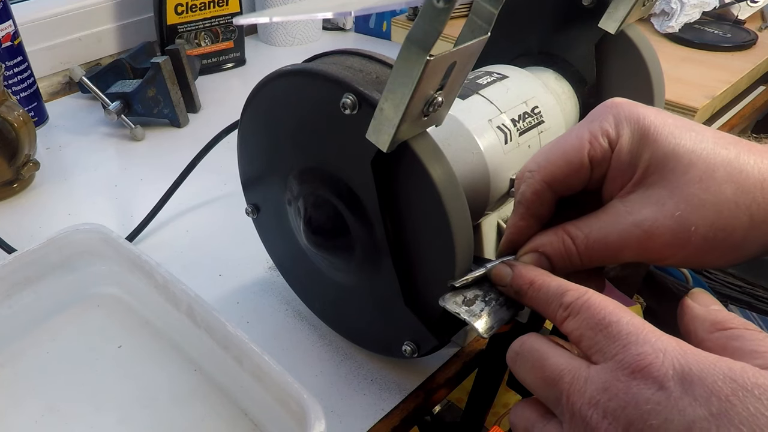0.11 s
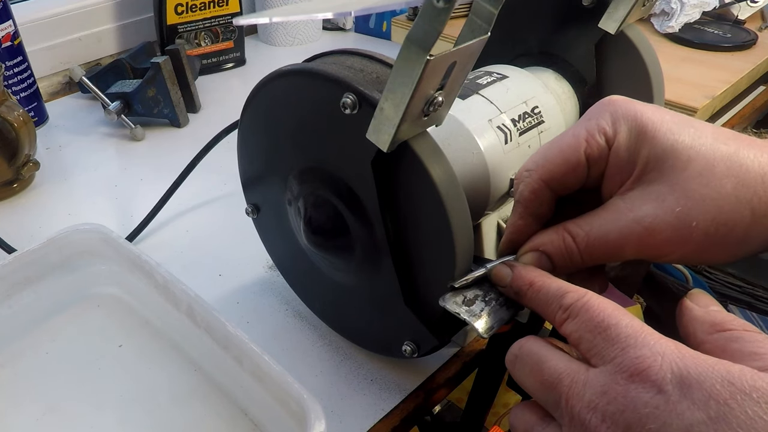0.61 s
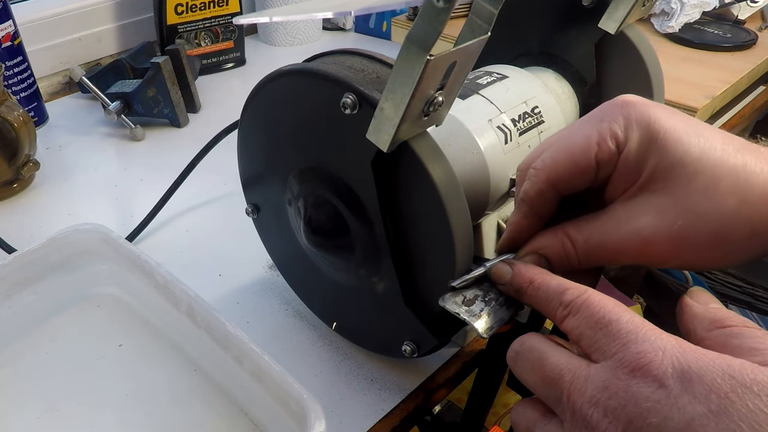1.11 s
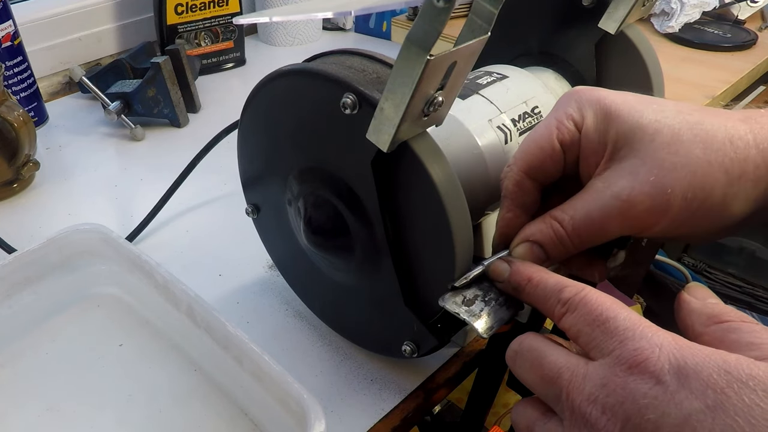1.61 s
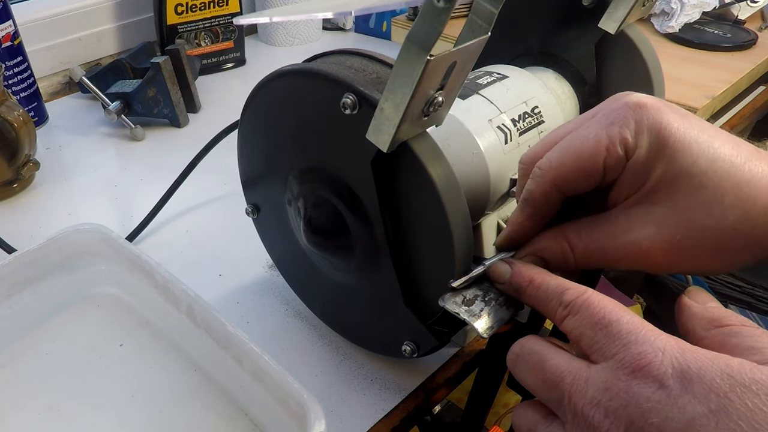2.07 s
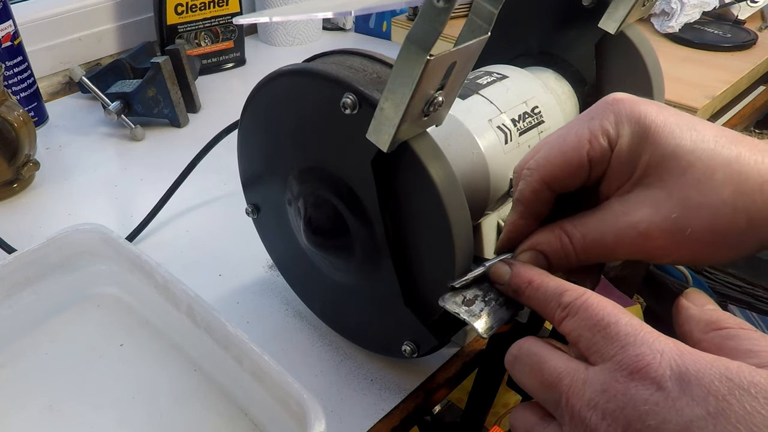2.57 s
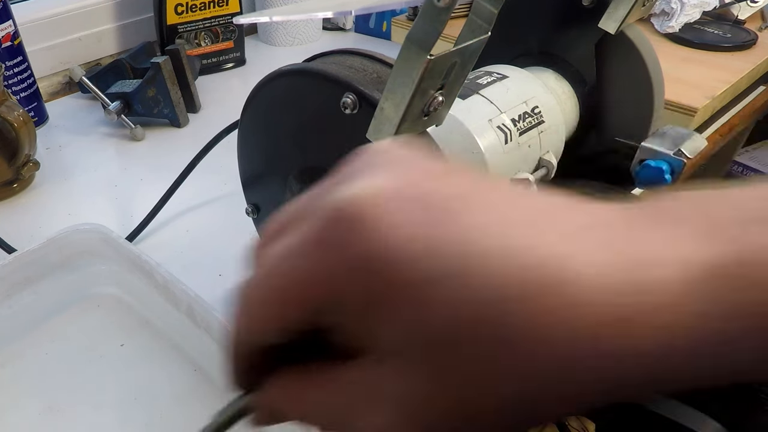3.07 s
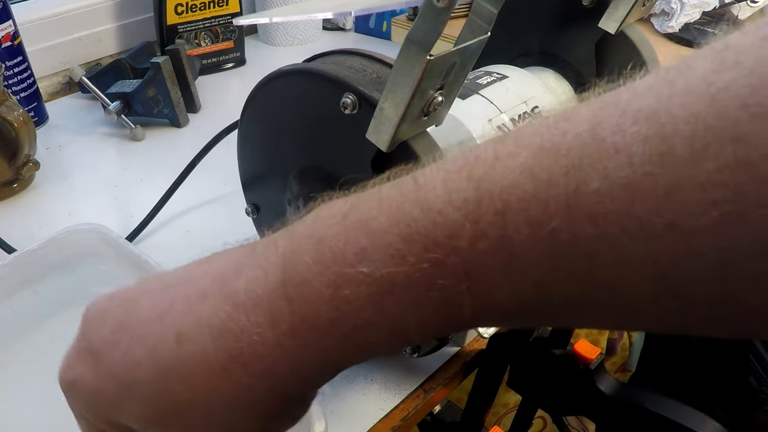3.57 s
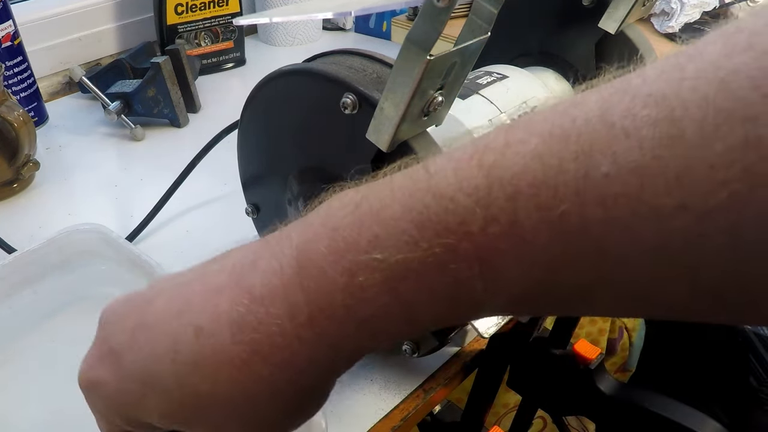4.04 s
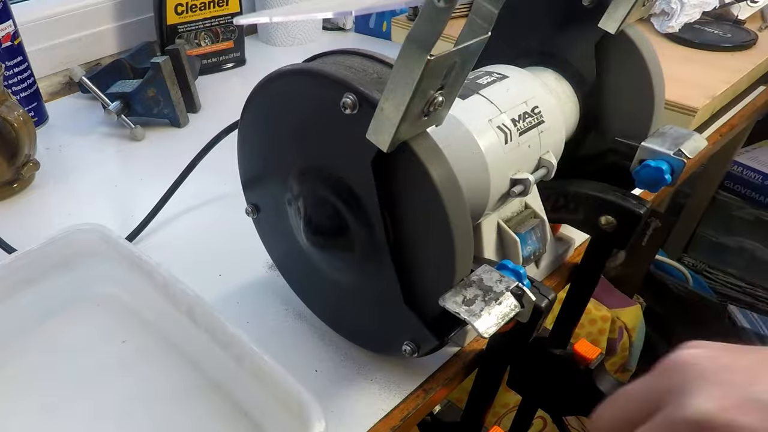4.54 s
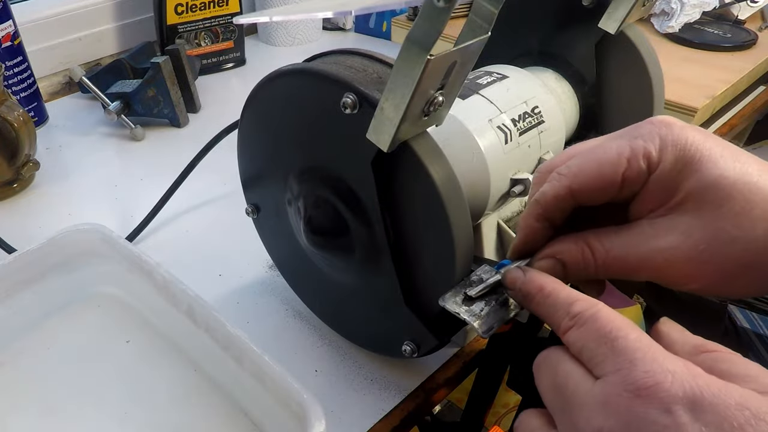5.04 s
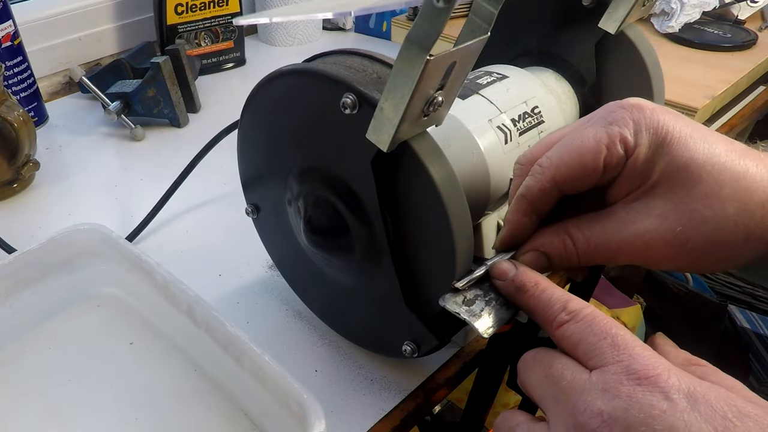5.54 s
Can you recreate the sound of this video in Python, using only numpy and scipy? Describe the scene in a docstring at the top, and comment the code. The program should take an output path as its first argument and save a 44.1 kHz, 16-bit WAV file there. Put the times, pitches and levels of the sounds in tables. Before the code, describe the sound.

Close in a small workshop, a steel bit presses on a bench grinder's wheel: a loud, high hissing squeal with fluttering rasp and metallic ringing. Just before three seconds it leaves with a sharp tick. The much quieter motor hum and rushing air run on, with small clicks around five seconds and a bright touch at the very end. Single close microphone, mono, fairly dry.

```python
"""In a workshop, at a bench grinder: a steel bit is held against the spinning wheel, then lifted off.
The grit scrapes the bit, throbbing once a turn, and rings the bit, tool rest and wheel guard.
Short ticks sound as the bit touches metal or wheel; motor and bench hum on, in rushing air.
Bit and ticks get short echoes from bench and walls, 18 dB under the direct sound.
At the microphone, gain control that listens to the treble holds the hum down while the hiss is loud."""
import sys
import numpy as np
from scipy import signal
from scipy.fft import rfft, irfft
from scipy.io import wavfile
from scipy.ndimage import uniform_filter1d

SR = 44100
rng = np.random.default_rng(int(sys.argv[2]) if len(sys.argv) > 2 else 0)


def volts_from_db(level):
    """Convert decibel levels to linear amplitude ratios."""
    exponent = np.asarray(level, float) / 20
    return 10 ** exponent


def wav_record(signal):
    """Record a signal, one row per channel, as 16-bit PCM in the file named by sys.argv[1]."""
    frames = np.transpose(np.atleast_2d(signal))
    bounded = np.clip(frames, -1, 1)
    # unit amplitude maps onto the largest positive 16-bit level
    quanta = np.round(bounded * 32767).astype(np.int16)
    wavfile.write(sys.argv[1], SR, quanta)


N = 249165
LIFT_S = 2.76  # the bit comes off and the wheel runs free

# modes of the bit: [f/Hz, width/Hz, level/dB]
BIT_MODES = [(4166, 30, -1), (4638, 45, -3), (5170, 45, -5), (5500, 35, -6), (5848, 45, -3), (6005, 30, -6),
             (6275, 35, -4), (6460, 30, -3), (6760, 40, -6), (7800, 100, -8)]
# the bit's clear high pair of modes: [f/Hz, width/Hz, level/dB]
HIGH_PAIR = [(7196, 18, 0), (7462, 14, -5)]
# the bit's clear low pair of modes: [f/Hz, width/Hz, level/dB]
LOW_PAIR = [(3751, 20, 0), (3551, 22, -3)]
# modes of the tool rest, lowest first: [f/Hz, width/Hz, level/dB]
REST_MODES = [(1186.3, 30, 13), (1355, 60, 1.5), (1690, 214, 2), (1907, 96, -3), (2120, 175, -3.5),
              (2616, 70, -8)]


def evened(x):
    """Scales to rms 1."""
    return x / np.sqrt(np.mean(x ** 2) + 1e-20)


def columns(rows):
    """Draws each column as a curve over time; the first column is t/s."""
    s, *cols = np.transpose(rows)
    return [np.interp(np.arange(N) / SR, s, c, right=c[-1]) for c in cols]


def drift(hz):
    """Slow chance up to hz, rms 1."""
    knots = rng.standard_normal(int(N / SR * 200) + 2)
    knots = signal.lfilter([1], [1, -np.exp(-2 * np.pi * hz / 200)], knots)
    return np.interp(np.arange(N) * 200 / SR, np.arange(len(knots)), evened(knots))


def above(x, hz):
    """High-pass filter of third order."""
    return signal.sosfilt(signal.butter(3, hz, "high", fs=SR, output="sos"), x)


def coloured(x, points):
    """Shapes the spectrum along (f/Hz, level/dB per Hz), then evens it."""
    f, db = np.transpose(points)
    hz = np.fft.rfftfreq(N, 1 / SR)
    gain = volts_from_db(np.interp(np.log(hz + 1), np.log(f + 1), db))
    return evened(irfft(rfft(x) * gain, N))


def patchy(x, depth_db):
    """Random patches of a few hundred Hz by a few dozen ms swell and fade."""
    z = signal.stft(x, nperseg=512)[2]
    patches = uniform_filter1d(rng.standard_normal(z.shape), size=7, axis=0)
    patches = uniform_filter1d(patches, size=12, axis=1)
    return evened(signal.istft(z * volts_from_db(depth_db * evened(patches)), nperseg=512)[1][:N])


def resonate(x, hz, width):
    """Shifts hz down to zero, smooths, and shifts back: a resonance of gain 1."""
    turn = np.exp(2j * np.pi * np.cumsum(hz * np.ones(len(x))) / SR)
    r = np.exp(-np.pi * abs(width) / SR)
    return 2 * (turn * signal.lfilter([1 - r], [1, -r], x / turn)).real


def rings(x, modes, db, waver_db=0, wander=0):
    """Drives a set of modes, each swelling and shifting on its own; db sets their joint level."""
    power = sum(volts_from_db(2 * g) * 2 * np.pi * abs(w) / SR for _, w, g in modes)
    out = 0
    for f, w, g in modes:
        hz = f * (1 + wander * drift(hz=4.5))
        drive = x * volts_from_db(db + g + waver_db * drift(hz=0.84))
        out = out + resonate(resonate(drive, hz, w), hz, 6 * w)
    return out / np.sqrt(power)


def sings(modes, db):
    """Modes kept going by the wheel: tones that waver in level and pitch."""
    out = 0
    for f, _, g in modes:
        level = volts_from_db(db + g + 3 * drift(hz=27)) * np.sqrt(2)
        hz = f + 8 * drift(hz=23.6)
        out = out + level * np.sin(2 * np.pi * np.cumsum(hz) / SR)
    return out


def wheel():
    """Turns made so far: slowed while the bit loads the wheel, then creeping back to idle speed."""
    # wheel speed while the bit loads it: [t/s, turns per s]
    loaded_speed = [(0, 49.37), (.2, 49.2), (.3, 48.4), (.6, 48.2), (1.2, 48.53), (1.5, 47.81),
                    (1.8, 47.53), (2.1, 47.92), (2.4, 47.38), (2.76, 47.56)]
    idle_turns_per_s, recover_s, start_turn = 49.37, .385, .03
    since_lift = np.maximum(np.arange(N) / SR - LIFT_S, 0)
    lag = (idle_turns_per_s - columns(loaded_speed)[0]) * np.exp(-since_lift / recover_s)
    return start_turn + np.cumsum(idle_turns_per_s - lag) / SR


def grit(turns, memory, grain_db):
    """The wheel's face as turns x angle: each turn meets nearly the grains of the last."""
    shape = (int(turns[-1]) + 2, 920)
    face = signal.lfilter([1], [1, -np.clip(memory, 0, .95)], rng.standard_normal(shape), axis=0)
    face *= volts_from_db(grain_db * uniform_filter1d(rng.standard_normal(shape), size=24, axis=1))
    return evened(face[turns.astype(int), (turns % 1 * shape[1]).astype(int)])


def tip_squeal(pressed, turns, squeal_db):
    """The tip's resonances squeal under the grit; one slides as the tip slides along the wheel."""
    # sliding (its pitch comes from slide), low, high partner, two at the top:
    # [f/Hz, width/Hz before narrowing, level/dB]
    partials = [(12000, 428, 8.5), (11470, 750, -7), (13200, 850, 1), (14900, 360, -23), (16000, 300, -27)]
    # the tip slides along the wheel: [t/s, squeal f/Hz, level of its high partner/dB]
    slide = [(0, 12020, -16), (.9, 12000, -16), (1.35, 12180, -14), (1.5, 12300, -3), (1.65, 12500, 0),
             (1.91, 12450, 1), (1.96, 12270, -19), (2.3, 12220, -17), (2.42, 12130, -13), (2.68, 12220, -7),
             (2.76, 12300, -10), (2.8, 11900, -6)]
    squeal_hz, partner_db = columns(slide)
    # strokes (turns) differ in level
    stroke_db = 1.8 * np.interp(turns, np.arange(300), rng.standard_normal(300))
    tip = pressed(1.22, chatter_db=1.5) * volts_from_db(squeal_db + stroke_db + 12.0)
    early = np.roll(tip, -round(.003 * SR))  # the high partner speaks 3 ms early in each stroke
    out = 0
    for k, (f, width, db) in enumerate(partials):
        hz = squeal_hz if k == 0 else f
        sign = 1 if k == 0 else -1  # partners in antiphase
        level = volts_from_db(db + (partner_db if k == 2 else 0))
        drive = early if k == 2 else tip
        out = out + sign * level * resonate(resonate(drive, hz, width), hz, 0.84 * width)
    return above(out, hz=7450)


def grit_scrape(pressed, scrape_db):
    """Broad noise of grains scraping steel, in patches of pitch and time."""
    # spectrum of the scrape: [f/Hz, level/dB per Hz]
    spectrum = [(40, -100), (300, -60), (600, -55), (1000, -28.5), (1700, -12.5), (2950, -6.5), (3500, 1),
                (7500, 1), (8500, -7), (10500, -7), (14200, -2.5), (15000, -2), (15600, -7.5)]
    noise = coloured(pressed(0.71, chatter_db=1.5), spectrum)
    return patchy(noise, depth_db=1.5) * volts_from_db(scrape_db - 1.2)


def bit_ring(pressed, scrape_db, free_db):
    """The grit shakes the bit's modes; its two clear pairs sing on almost as tones."""
    # upper modes of the bit: [f/Hz, width/Hz, level/dB]
    upper_modes = [(9370, 130, 0), (9740, 560, 0.5), (10760, 200, 3.5)]
    # the clear pairs: [t/s, high pair level/dB, low pair level/dB]
    pair_levels = [(0, -22, -17), (.07, -12, -17), (.3, -13, -15), (.5, -15, -20), (.65, -10, -20),
                   (.8, -13, -21), (1.0, -10, -13), (1.12, -13, -21), (1.4, -14, -22), (1.55, -21, -25),
                   (1.78, -17, -23), (2.0, -14, -14), (2.19, -12, -15), (2.4, -15, -16), (2.55, -19, -17),
                   (2.73, -18, -18), (2.77, -19, -27), (2.815, -28, -36), (2.85, -42, -46), (2.9, -70, -60)]
    ring = rings(pressed(1.0), BIT_MODES, scrape_db - 9.5, waver_db=3, wander=0.004)
    ring += rings(pressed(0.9), upper_modes, scrape_db + free_db, waver_db=1.5)
    high_db, low_db = columns(pair_levels)
    ring += sings(HIGH_PAIR, high_db) + sings(LOW_PAIR, low_db)
    return above(ring, hz=1820)


def outbursts(face):
    """One mode of bit or rest rings out for a while, along a flat-topped arch."""
    # [start t/s, length/s, f/Hz, width/Hz, level/dB]
    bursts = [(0, .5, 5740, 30, -33), (.03, 0.57, 2125, 30, -23), (.1, 0.38, 1703, 40, -16.5),
              (0.474, 0.33, 2600, 70, -16), (0.835, 0.12, 5440, 25, -15), (1.0, 0.069, 4590, 40, -9),
              (1.68, 0.13, 2770, 50, -20), (1.99, 0.7, 4060, 30, -33), (2.1, 0.57, 4670, 50, -17),
              (0, 0.53, 2560, 50, -17), (2.025, 0.021, 5940, 30, -2), (2.504, 0.29, 4150, 30, -21)]
    out = np.zeros(N)
    for s, length, hz, width, db in bursts:
        part = out[round(s * SR):][:round(length * SR)]
        arch = np.sqrt(np.sin(np.pi * np.arange(len(part)) / len(part)))
        part += volts_from_db(db) * arch * evened(resonate(face[round(s * SR):][:len(part)], hz, width))
    return out


def frame_ring(pressed, face, scrape_db, weight_db, ring_db, contact_db):
    """The shaking passes on to the modes of tool rest and wheel guard."""
    # modes of the wheel guard: [f/Hz, width/Hz, level/dB]
    guard_modes = [(447.3, 5.9, 0.5), (494, 72, -9.5), (519.3, 34, 2), (550.5, 10, 8), (650, 7, -34),
                   (817, 44, -10)]
    # the rest's upper modes: [t/s, level/dB]
    rest_top = [(0, -7), (.25, -10.5), (.45, -11.5), (.7, -6.5), (1.0, -12), (1.3, -13.5), (1.45, -11.5),
                (1.57, -8), (1.75, -15.5), (1.85, -23.5), (2.03, -17.5), (2.2, -14.5), (2.4, -6),
                (2.55, -12), (2.7, -5), (2.76, -9.5)]
    rest_db = -5 + scrape_db + weight_db
    guard_db = -3 + 0.37 * scrape_db + ring_db  # the guard follows the hand only in part
    lowest = REST_MODES[:1]
    ring = rings(pressed(0.27, chatter_db=3), lowest, rest_db - 3, waver_db=1, wander=0.003)
    ring += rings(pressed(1.0), guard_modes, guard_db, waver_db=1.5)
    ring += rings(pressed(0.65), REST_MODES[1:], columns(rest_top)[0], waver_db=1.5, wander=0.008)
    ring += outbursts(face)
    # part of the lowest mode holds as a tone
    ring += sings([(lowest[0][0], 0, -5)], rest_db + contact_db)
    return above(ring, hz=322)


def grinding(turns):
    """Grit, throbbing once a turn, drives the tip, the bit, the rest and the guard."""
    # the hand pushes the bit in and eases off: [t/s, pressure/dB, squeal level/dB]
    hand = [(0, -4, 3), (.1, 1, 9), (.27, -0.5, 2), (.36, 1, 7.5), (.5, -3.5, 8.5), (.63, -1, 7),
            (.8, -4, 8.5), (.9, -4.5, 3.5), (1, -1, -0.5), (1.1, -5.5, 4.5), (1.35, -8.5, 5),
            (1.44, -6, 6.5), (1.53, -2.5, 0.5), (1.64, -5.5, 3.5), (1.73, -5.5, 1), (1.82, -8, -3),
            (1.98, -7.5, 3), (2.07, -1, 1), (2.25, 0.5, -3.5), (2.34, -4.5, 4.5), (2.43, -0.5, 6),
            (2.54, -5.5, 4.5), (2.7, -1.5, 8), (2.75, -8, 2), (2.775, -9, -15), (2.9, -9, -18)]
    # how the bit is held: [t/s, its freedom to ring/dB, weight on the rest/dB, guard's ring/dB]
    hold = [(0, 2, -5, -3.5), (.35, -5, 0, -9.5), (.45, 2, -5.5, -7), (.63, 0, 1, -4.5),
            (.78, 1.5, -2, -2.5), (.88, -1.5, -1.5, -1), (1.02, -5, 0.5, 4), (1.2, -5, -6, -3.5),
            (1.33, -6, 1.5, -2.5), (1.43, -9, -8, -5), (1.5, -6, -8, -3.5), (1.62, -18, -27, -11.5),
            (1.71, -10, -5, -10), (1.77, -8, -16, -7), (1.88, -15, -13.5, -6.5), (1.98, -9, -1, -3.5),
            (2.1, 0, -7.5, -10), (2.27, -1.5, -9, -4), (2.42, -6, -1, -4), (2.49, -8, -12, -5),
            (2.6, -9, -4.5, -5.5), (2.76, -5, -2, -4)]
    # how hard the out-of-round wheel throbs against the bit: [t/s, depth/dB before each part's share]
    throb_depth = [(0, 2.5), (.2, 2), (.35, 3.5), (.55, 1.5), (.75, 4.5), (.95, 0.5), (1.15, 5),
                   (1.35, 7.5), (1.55, 1.5), (1.75, 7), (1.9, 2.5), (2.0, 9), (2.25, 4), (2.4, 0.5),
                   (2.5, 6), (2.62, 1), (2.76, 6)]
    # the bit leaves the wheel, grazing it once more: [t/s, contact level/dB]
    leaving = [(0, 0), (2.75, 0), (2.772, -24), (2.8, -19), (2.83, -25), (2.87, -36), (2.95, -70)]
    scrape_db, squeal_db = columns(hand)
    free_db, weight_db, ring_db = columns(hold)
    throb_db, contact_db = columns(throb_depth)[0], columns(leaving)[0]
    # strokes bite fast and let go slowly
    high_spot = np.cos(2 * np.pi * turns) + .05 * np.cos(4 * np.pi * turns + np.pi / 2)
    face = grit(turns, memory=.7, grain_db=12)

    def pressed(share, chatter_db=1.8):
        """Grit under throb and chatter, evened over about three turns."""
        throb = volts_from_db(share * throb_db * high_spot + chatter_db * drift(hz=13.3))
        return face * volts_from_db(contact_db) * throb / np.sqrt(uniform_filter1d(throb ** 2, size=2730))

    squeal = tip_squeal(pressed, turns, squeal_db)
    scrape = grit_scrape(pressed, scrape_db)
    bit = bit_ring(pressed, scrape_db, free_db)
    frame = frame_ring(pressed, face, scrape_db, weight_db, ring_db, contact_db)
    return squeal + scrape + bit + frame


def hum_and_buzz(turns, loaded):
    """Shaft orders, plus mains hum that beats against the second order; unbalance is in the first two."""
    # [multiple of wheel speed, level/dB, change while running free/dB per s (from the third row on)]
    orders = [(1, -27, 0), (2, -9, 0), (3, -27, 0), (4, -6, 1), (5, -4, -1.5), (6, -10, 1), (7, 0, -2.5),
              (8, -5, -1), (9, -3, -2), (10, 3, -.5), (11, .5, 2.5), (12, -13.5, 0), (13, -22, 1),
              (14, -18, 0), (15, -17, 2), (16, -11.5, 3), (17, -11, -4), (18, -11, -4)]
    # magnetic hum: [multiple of the mains hum's pitch, level/dB]
    mains = [(1, -43), (2, -53), (3, -44)]
    shaft_db, settled_s = -33.5, 4.1  # at settled_s the orders have their listed levels
    mains_hz, mains_lead = 100.1, -.04  # the lead is in cycles
    t, start = np.arange(N) / SR, rng.random(len(orders))
    free_s = np.maximum(t, LIFT_S) - settled_s
    hum = 0
    for (k, db, db_per_s), phase in zip(orders[2:], start[2:]):
        level = volts_from_db(shaft_db + db + db_per_s * free_s + 0.37 * drift(hz=11))
        hum = hum + level * np.cos(2 * np.pi * (k * turns + phase))
    for k in range(19, 47):  # the faint upper multiples come and go, 0.54 dB weaker at each
        db = -17 - 0.54 * (k - 19) + 4 * rng.standard_normal() + 4 * drift(hz=8.0)
        hum += volts_from_db(shaft_db + db) * np.cos(2 * np.pi * (k * turns + rng.random()))
    buzz = sum(volts_from_db(shaft_db + db) * np.cos(2 * np.pi * (k * turns + start[1])) for k, db, _ in orders[:2])
    mains_turns = mains_hz * t + start[1] + mains_lead
    buzz += sum(volts_from_db(db) * np.cos(2 * np.pi * k * mains_turns) for k, db in mains)
    return np.sqrt(2) * (hum + volts_from_db(7 * loaded) * buzz)  # mains hum and unbalance grow under load


def bearings():
    """Noise through narrow resonances: wavering tones."""
    # [f/Hz, level/dB]
    tones = [(175, -22), (463, -20), (520, -12), (567, -19)]
    return rings(rng.standard_normal(N), [(f, 6, db) for f, db in tones], -37.5)


def air_rush(rush):
    """Rushing air, a noise that also rings the housing."""
    # spectrum of the air: [f/Hz, level/dB per Hz]
    spectrum = [(15, -63), (25, -40), (91, -5.5), (145, -20), (185, -6.5), (344, 3), (404, -0.5),
                (488, 8.5), (694, -7.5), (816, -13.5), (1040, -11), (1190, -7.5), (2300, -15.5),
                (3510, -21.5), (8110, -17.5), (15900, -47)]
    # modes of the housing: [f/Hz, width/Hz, level/dB]
    housing = [(827, 70, 2), (1195, 26, 2.5), (1628, 90, -12), (3200, 130, -17), (5610, 400, -15.5),
               (7420, 210, -6), (8040, 350, -8.5), (8840, 320, -15.5), (10740, 330, -16)]
    return volts_from_db(-29) * coloured(rush, spectrum) + rings(rush, housing, -32)


def bench_drone():
    """A low wandering tone of the bench, strongest from 1.5 to 2.9 s, then fading."""
    # [t/s, level/dB]
    drone_levels = [(0, -38), (1.2, -53), (1.5, -30), (2.1, -26), (2.9, -28.5), (3.3, -46), (5.65, -50)]
    level = volts_from_db(columns(drone_levels)[0] + 0.5 * drift(hz=9.6))
    hz = 210.7 + 1.58 * drift(hz=4.3)
    return level * np.sin(2 * np.pi * np.cumsum(hz) / SR)


def motor(turns):
    """Hum, bearing tones, air, drone and hiss; load softens the hum and lifts the air."""
    # the machine, all but the drone, grows louder towards the end: [t/s, level/dB]
    swell = [(0, 3), (2.9, 0.5), (3.3, 0.5), (4.4, 0.5), (4.9, 2.5), (5.2, 4.5), (5.4, 6), (5.65, 7)]
    swell_db = columns(swell)[0]
    loaded = uniform_filter1d(1. * (np.arange(N) / SR < LIFT_S), size=6000)
    hum_db = swell_db - 5.5 * loaded
    air_db = 1.52 * swell_db + 3 * loaded - 2.5 * (1 - loaded)
    hum = hum_and_buzz(turns, loaded) + bearings()
    rush = rng.standard_normal(N) * volts_from_db(0.15 * np.cos(2 * np.pi * turns) + .9 * drift(hz=20))
    air = air_rush(rush)
    hiss_spectrum = [(6000, -15.0), (11500, -4.0), (13500, -5.5), (16000, -16)]  # (f/Hz, dB per Hz)
    hiss = volts_from_db(-46.5 + 1.5 * swell_db) * coloured(rush, hiss_spectrum)
    return hum * volts_from_db(hum_db) + air * volts_from_db(air_db) + bench_drone() + hiss


def ticks():
    """The bit touches metal or wheel: a noise burst round one pitch, which also rings bit and rest."""
    # [t/s, peak level/dB, f/Hz, length/s, drive to bit and rest/dB]
    touches = [(2.7632, 10.5, 12300, 0.01, -12), (3.19, -22, 1780, 0.012, -40),
               (5.022, -19, 11900, 0.01, -27), (5.022, -20, 6500, .015, -36), (5.162, -20, 8000, .015, -55),
               (5.171, -24, 4400, .022, -55), (5.176, -25, 3500, .04, -55), (5.185, -23, 8000, .012, -55),
               (5.637, 1, 12400, 0.014, -30)]
    clicks, blows = np.zeros(N + 2000), np.zeros(N + 2000)
    t = np.arange(2000) / SR
    for s, db, hz, length, ring_db in touches:
        blow = volts_from_db(-60 * t / length) * rng.standard_normal(len(t))
        click = resonate(blow, hz, min(0.23 * hz, 1300))
        click = resonate(click, hz, min(0.35 * hz, 2000))
        clicks[round(s * SR):][:len(t)] += volts_from_db(db) * click / abs(click).max()
        blows[round(s * SR):][:len(t)] += volts_from_db(ring_db) * blow
    blows = blows[:N]
    bit = rings(blows, BIT_MODES + LOW_PAIR, -8) + rings(blows, HIGH_PAIR, 0)
    return clicks[:N] + bit + rings(blows, REST_MODES[:1], 8)


def workshop(x):
    """Sparse echoes of random sign from bench and walls."""
    room_db, room_t60_s = -18, .15
    slots = np.arange(60, SR // 2, 20)
    at = slots + rng.integers(0, 20, len(slots))
    tail = np.zeros(SR // 2 + 20)
    tail[at] = rng.choice([-1., 1.], len(at)) * volts_from_db(-60 * at / SR / room_t60_s)
    return x + volts_from_db(room_db) * signal.fftconvolve(x, tail / np.linalg.norm(tail))[:N]


def scene():
    """Bit and ticks with their echoes, over the machine, in one channel."""
    turns = wheel()
    return (workshop(grinding(turns) + ticks()) + motor(turns))[None]


def top_cut(x):
    """Nothing passes above the cut-off."""
    return signal.sosfilt(signal.butter(12, 16080, fs=SR, output="sos"), x)


def record(dry):
    """Microphone side: gain control that listens to the treble, soft overload, band limit."""
    treble = above(dry[0], hz=3000)
    power_db = 10 * np.log10(abs(uniform_filter1d(treble ** 2, size=1800)) + 1e-12)
    over_db = uniform_filter1d(np.maximum(power_db + 21.5, 0), size=600)
    held = dry * volts_from_db(-.67 * over_db)
    soft = 1.16 * np.tanh(held / 1.06)
    low_pass = signal.firwin(1201, 15800, window=("kaiser", 9), fs=SR)  # edge in Hz
    mix = signal.oaconvolve(soft, low_pass[None], "same")
    return top_cut(mix)


dry = scene()
out = record(dry)
wav_record(out)
```